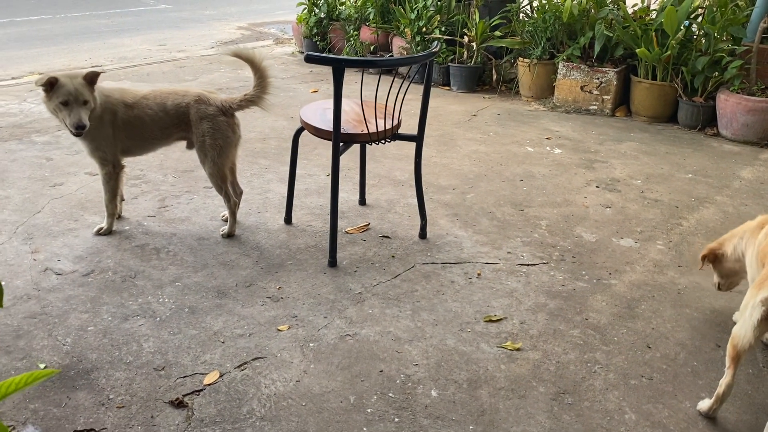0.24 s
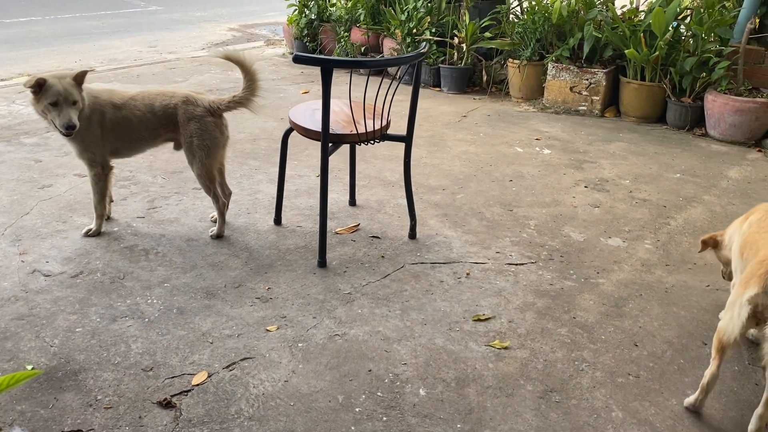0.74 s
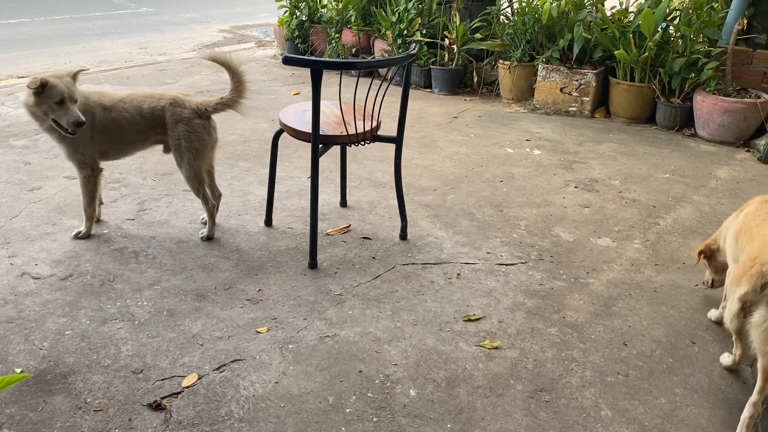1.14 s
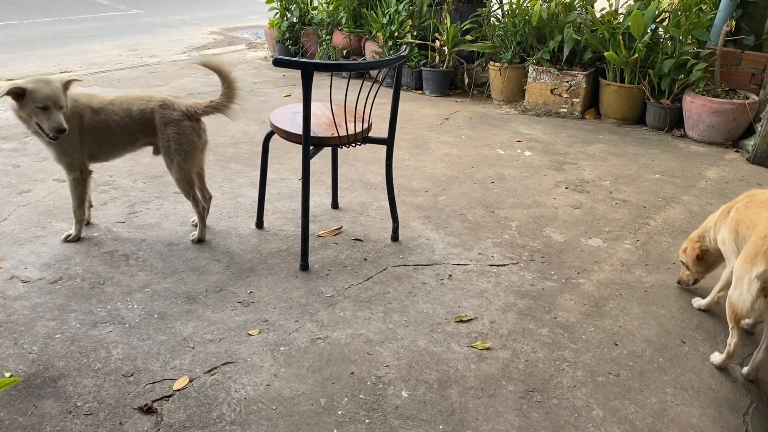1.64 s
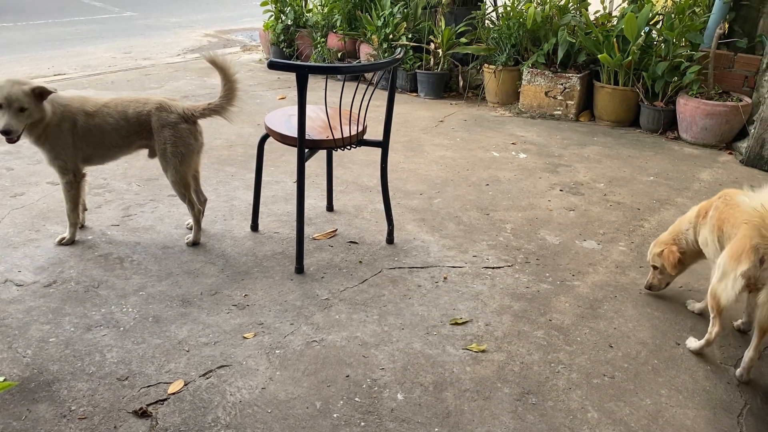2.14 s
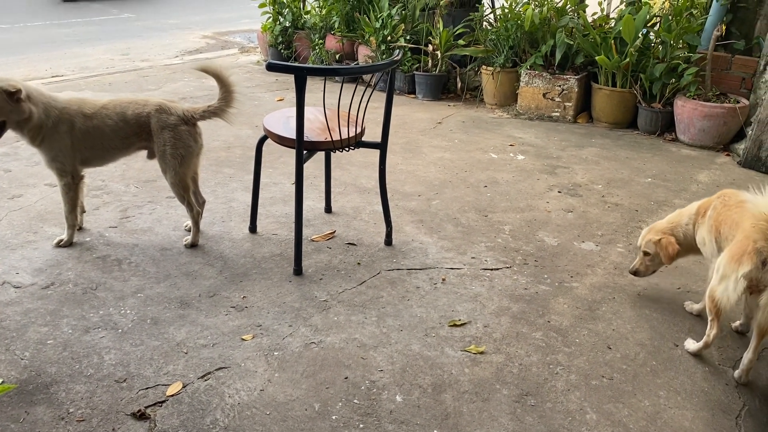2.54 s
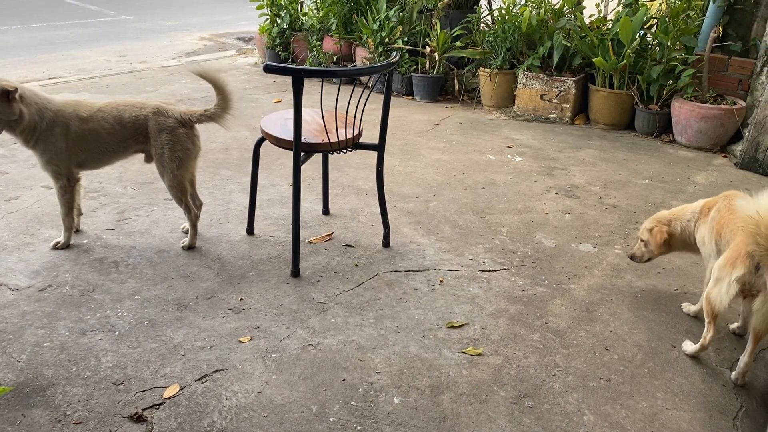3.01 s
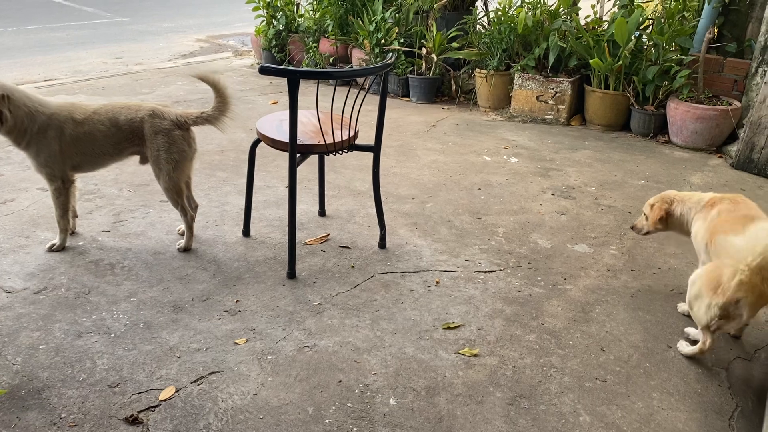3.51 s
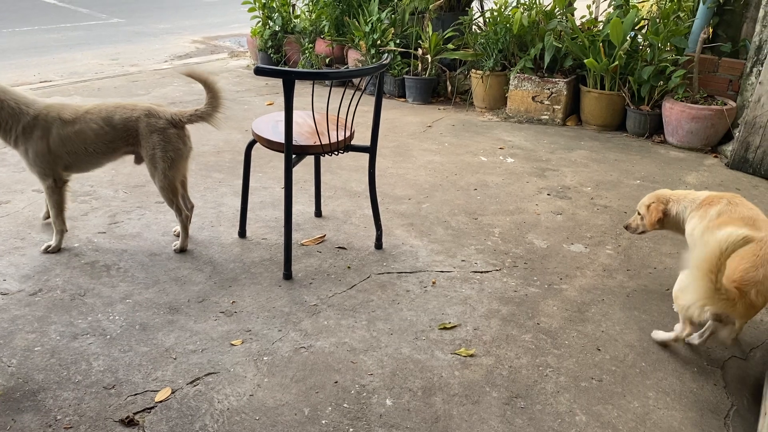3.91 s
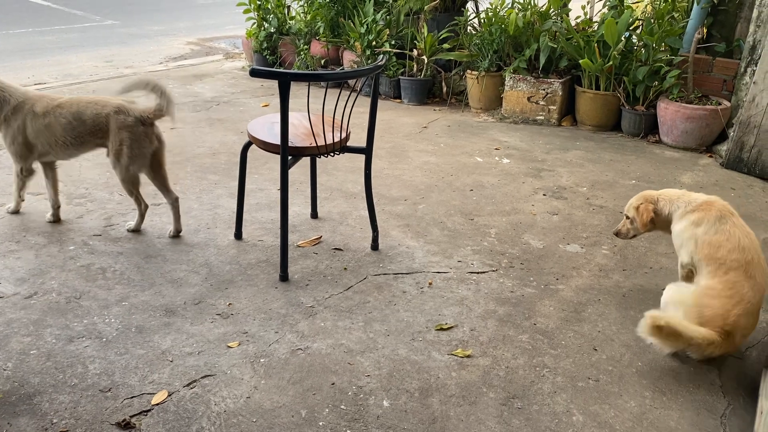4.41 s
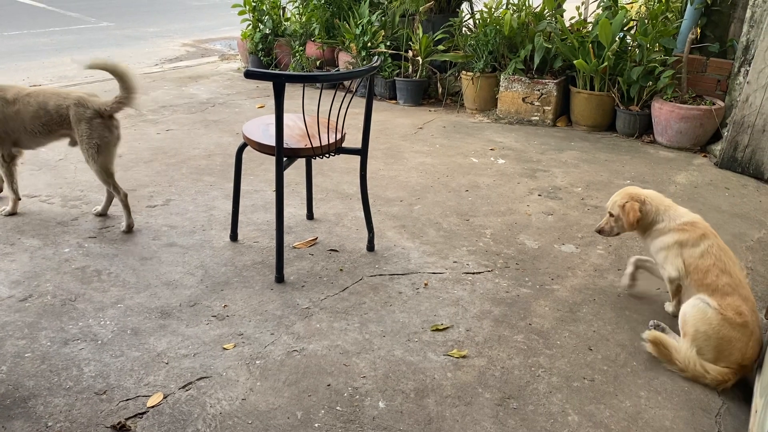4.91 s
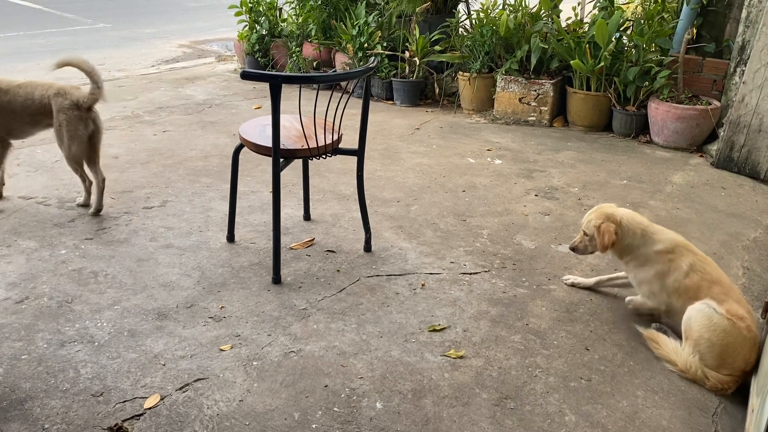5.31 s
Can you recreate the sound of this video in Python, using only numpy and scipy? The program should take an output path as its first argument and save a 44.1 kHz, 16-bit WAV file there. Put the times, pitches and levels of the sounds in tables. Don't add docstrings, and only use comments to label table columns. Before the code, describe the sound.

Small engines pass one after another on a nearby road with throbbing exhaust and tyre rumble, while faint sparrows chirp and a dog's claws tick on concrete.

```python
import sys
import numpy as np
from scipy import signal
from scipy.fft import rfft, irfft, next_fast_len
from scipy.io import wavfile
from scipy.ndimage import uniform_filter1d, map_coordinates

SR = 44100
rng = np.random.default_rng(int(sys.argv[2]) if len(sys.argv) > 2 else 0)


def transcribe(signal):
    frames = np.atleast_2d(signal).T
    limited = np.clip(frames, -1, 1)
    pcm = np.round(limited * 32767).astype(np.int16)
    wavfile.write(sys.argv[1], SR, pcm)


def decibels_to_gain(level_db):
    exponent = np.asarray(level_db, float) / 20
    return 10 ** exponent


N = 244755
T = np.arange(N) / SR


def along(points, hz):
    f, value = np.transpose(points)
    return np.interp(np.log(hz + 1), np.log(f + 1), value)


def curves(rows):
    s, *columns = np.transpose(rows)
    return [np.interp(T, s, column) for column in columns]


def sounding(rows, fade_s=0.37):
    inside_s = np.minimum(T - rows[0][0], rows[-1][0] - T)
    return np.clip(inside_s / fade_s + 1, 0, 1)


def unit(x):
    return x / np.sqrt(np.mean(x ** 2) + 1e-20)


def stereo_noise():
    return rng.standard_normal((2, N))


def wander(t, rate, knots=200):
    return map_coordinates(rng.standard_normal(knots), [t * rate])


def wobble(rate):
    coarse = T[::64]
    return np.interp(T, coarse, wander(coarse, rate, knots=400))


def filtered(x, response):
    m = next_fast_len(N + 8192)
    return irfft(rfft(x, m) * response(np.fft.rfftfreq(m, 1 / SR)), m)[..., :N]


def notch(hz, at_hz, width_hz):
    return 1 - .85 * np.exp(-((hz - at_hz) / width_hz) ** 2)


# frequency_hz, share
LEFT_LEADS = [(100, 0.56), (500, 0.58), (950, 1), (1500, .1), (3000, 0.43), (6000, .1)]


def ports(x, alike, opposite, side_db):
    mid = unit(filtered(x[0], lambda hz: decibels_to_gain(along(alike, hz)) * notch(hz, 8420, 240)))

    def difference(hz):
        share = np.clip(along(LEFT_LEADS, hz), 0, 1)
        colour = decibels_to_gain(along(opposite, hz)) * notch(hz, 10050, 250)
        return colour * [1j * share, np.sqrt(1 - share ** 2)]

    side = decibels_to_gain(side_db) * unit(filtered(x, difference).sum(axis=0))
    return np.array([mid + side, mid - side])


def patchy(db):
    z = signal.stft(stereo_noise(), nperseg=512)[2]
    field = uniform_filter1d(rng.standard_normal(z.shape[1:]), size=5, axis=0)
    field = uniform_filter1d(field, size=12, axis=1)
    return signal.istft(z * decibels_to_gain(db * unit(field)), nperseg=512)[1][:, :N]


def band(hz, width_hz):
    slow = filtered(stereo_noise(), lambda f: 1 / (1 + (f / width_hz) ** 2))
    turn = 2 * np.pi * hz * T
    return unit(slow[0] * np.cos(turn) + slow[1] * np.sin(turn))


def swells(rows, width_hz):
    out = np.zeros(N)
    for s, hz, db, half_s in rows:
        out += decibels_to_gain(db) * np.exp(-((T - s) / half_s) ** 2) * band(hz, width_hz)
    return out


# frequency_hz, level_db
IDLE_TONES = [(81, -45), (107, -46), (128, -50), (141, -43.5), (162, -49)]


def distant_idle():
    return sum(decibels_to_gain(db) * band(hz, width_hz=1.5) for hz, db in IDLE_TONES)


# peak_s, frequency_hz, level_db, half_length_s
WHINE_SWELLS = [(2.12, 3240, -51, .17), (2.82, 3220, -55, .12), (2.92, 1600, -48, .2),
                (2.55, 1790, -50, .15), (4.12, 2130, -53, .02), (4.27, 2050, -56, .1),
                (4.28, 3220, -58, .05), (4.62, 2030, -56, .06), (2.15, 3750, -53, .15)]


def far_whine():
    return swells(WHINE_SWELLS, width_hz=40)


# start_s, start_pitch_hz, end_pitch_hz, length_s, level_db
CHIRPS = [
    (1.187, 4950, 4500, .025, -45),
    (1.874, 5350, 4204, 0.067, -45),
    (2.625, 5200, 4800, .025, -48),
    (2.655, 4700, 4050, .03, -48),
    (3.715, 5250, 4130, 0.064, -46.5),
    (4.329, 5700, 6350, .028, -59),
    (4.346, 5170, 4550, .032, -50.5),
    (4.356, 4500, 3330, .045, -51),
    (4.908, 5300, 3890, 0.062, -46.5),
]


def sparrows():
    out = np.zeros((2, N + SR))
    for s, start_hz, end_hz, length_s, db in CHIRPS:
        t = np.arange(round(length_s * SR)) / SR
        hz = end_hz + (start_hz - end_hz) * np.exp(-3.5 * t / length_s)
        hz = hz + 115 * wander(t, rate=500)
        turn = 2 * np.pi * np.cumsum(hz) / SR
        voices = np.sin(turn) + .35 * np.sin(1.14 * turn)
        grain = decibels_to_gain(2.5 * wander(t, rate=250))
        fading = decibels_to_gain(4 - 8 * t / length_s)
        note = unit(voices * grain) * np.sin(np.pi * t / length_s) ** 0.25 * fading

        walls = rng.standard_normal((2, SR // 5)) * decibels_to_gain(-60 * np.arange(SR // 5) / SR / 0.28)
        walls = decibels_to_gain(4) * walls / np.linalg.norm(walls[0])
        walls[:, 0] = 1
        call = decibels_to_gain(db - 2.0) * signal.fftconvolve(note[None], walls, axes=1)
        out[:, round(s * SR):][:, :call.shape[1]] += call
    return out[:, :N]


# start_s, peak_db, t60_s
CLAWS = [
    (1.0915, -27, 0.025),
    (3.9575, -28, 0.013),
]
# frequency_hz, level_db_per_hz
TICK = [(2000, -30), (4000, -12), (5500, -16), (7000, -9), (8800, -2), (10400, 1), (11800, -12),
        (12800, -8), (14000, -11), (15200, -9), (16300, -17), (17000, -60)]
TICK_SIDE = [(2350, -49), (4000, -19), (4970, -8.5), (8600, -10), (9570, -15), (13300, -14.5), (13700, -28),
             (15600, -12), (16400, -25)]
# start_s, peak_db, t60_s
SNAGS = [
    (1.11, -37, 0.032),
    (3.957, -36, .012),
    (3.966, -39, .04),
    (3.996, -40, 0.042),
    (4.005, -45, .03),
    (4.044, -44, .03),
]
# frequency_hz, level_db_per_hz
GRIT = [(2350, -39), (4000, 2), (4920, -10), (5430, -24), (5900, -9), (7380, 1), (8810, -2), (10100, 4),
        (12100, -20), (14000, -36), (16400, -36)]
GRIT_SIDE = [(2350, -46), (4000, -16), (5530, -3), (8350, 0), (9450, -9), (9850, -21), (11300, -17),
             (12900, -17), (13700, -36), (15700, -17), (16400, -33)]


def bursts(rows):
    out = np.zeros(N)
    for s, db, t60_s in rows:
        out += decibels_to_gain(db - 8.0 - 60 * abs(T - s) / t60_s) * (T >= s - .0012)
    return out


def dog():
    hold_s, attack_s, release_s = .095, .003, .012
    level_db, sag_db = -49.5, 6
    t = T - 3.957
    stroke = np.clip(np.minimum(t / attack_s, 1 + (hold_s - t) / release_s), 0, 1)
    tiring_db = sag_db * np.clip(t / hold_s, 0, 1)
    scuff = stroke * decibels_to_gain(level_db - tiring_db + 2.8 * wander(T, rate=600, knots=4000))
    ticks = bursts(CLAWS) * ports(stereo_noise(), TICK, TICK_SIDE, side_db=1)
    return ticks + (scuff + bursts(SNAGS)) * ports(stereo_noise(), GRIT, GRIT_SIDE, side_db=2.0)


# time_s, roar_db, brightness_db
ROAD = [(0, -50.5, -9), (.28, -48.5, -8), (.52, -45, -9), (.79, -41.5, -9), (1.05, -39, -7.5),
        (1.25, -39.5, -5), (1.63, -39, -2.5), (1.82, -39.5, -4.5), (1.99, -40.5, -9), (2.15, -41.5, -6.5),
        (2.6, -43, -4.5), (2.75, -41.5, -6.5), (2.95, -42.5, -9), (3.23, -47, -9.5), (3.77, -49, -11),
        (4.5, -49, -10), (5.1, -45, -11.5), (5.5, -43.5, -8.5)]
# frequency_hz, level_db_per_hz
RUMBLE = [(20, -24), (44, -11), (52, -6), (60, -2), (80, 0), (100, -2), (140, -1), (175, -4), (220, -13),
          (290, -40), (480, -120)]
RUMBLE_SIDE = [(12, -57), (20, -27), (69, -24), (87, 1), (129, 16), (220, -16), (290, -43), (480, -120)]
DRONE = [(110, -43), (180, -5.5), (215, -7), (260, -3), (330, -2.5), (400, -5), (455, -13), (560, -23.5),
         (730, -63), (1230, -120)]
DRONE_SIDE = [(110, -27), (180, 2), (270, -12), (367, 3), (440, -15), (560, -4), (730, -19), (1230, -120)]
BODY = [(260, -39), (450, -7.5), (550, -1.5), (758, -3.5), (829, -3), (1040, -3), (1200, -12), (1560, -21),
        (2640, -120)]
BODY_SIDE = [(260, -25), (450, -4.5), (550, -3.5), (764, -5.5), (985, -3), (1200, -8), (1560, -34),
             (2640, -120)]
ROAR = [(680, -26), (1150, -3.5), (1220, -2.5), (1570, 0.5), (1900, -3), (2420, -3), (3050, -7),
        (3220, -6.5), (3800, -10.5), (4940, -17), (8360, -120)]
ROAR_SIDE = [(680, -37), (1150, -6), (1360, -2), (1770, -3), (2210, -11), (2420, -8.5), (2680, -11),
             (3240, -8.5), (3800, -15), (4940, -39), (8360, -120)]
HISS = [(1760, -9.5), (3000, -6.5), (3270, -3), (4690, -2), (6550, -2.5), (8450, -9.5), (10200, -3.5),
        (10900, -8), (11700, -24), (12000, -55), (12200, -67), (12900, -24), (14500, -20), (15300, -45),
        (16400, -79)]
HISS_SIDE = [(1760, -15), (3000, -3.5), (4430, -5), (5070, 0), (6270, -8.5), (8630, -1), (9540, -6),
             (10000, -25), (11000, -11), (12300, -9), (13200, -26), (13800, -60), (14300, -38),
             (15100, -25), (15600, -30), (16000, -70)]


def road_noise(throb, load_db):
    roar_db, open_db = curves(ROAD)
    swell_db = roar_db + 44
    rumble_db = -34 + 0.44 * swell_db + 0.057 * load_db
    drone_db = -39.5 + 0.28 * swell_db + 0.14 * load_db
    body_db = roar_db + 4 + 0.6 * open_db + 0.21 * throb
    body_gain = np.hypot(decibels_to_gain(body_db), decibels_to_gain(-57.5))
    throbbing_db = roar_db + 0.5 * throb + 0.21 * wobble(13)
    hiss_db = roar_db + open_db + 2 + 0.83 * throb + 0.78 * wobble(22.94)

    out = decibels_to_gain(rumble_db) * ports(stereo_noise(), RUMBLE, RUMBLE_SIDE, side_db=-19.5)
    out += decibels_to_gain(drone_db) * ports(stereo_noise(), DRONE, DRONE_SIDE, side_db=-8.0)
    out += body_gain * ports(patchy(0.74), BODY, BODY_SIDE, side_db=-2.0)
    out += decibels_to_gain(throbbing_db) * ports(patchy(0.99), ROAR, ROAR_SIDE, side_db=-2.0)
    out += decibels_to_gain(hiss_db) * ports(patchy(1.0), HISS, HISS_SIDE, side_db=-2.0)
    return out


# peak_s, frequency_hz, level_db, half_length_s
TREAD_SWELLS = [(1.13, 812, -42.5, 0.13), (1.5, 818, -42.5, 0.064), (2.3, 825, -44, 0.1),
                (1.88, 615, -44.5, 0.13), (2.68, 648, -46, 0.17), (1.25, 655, -50, 0.15),
                (2.51, 1005, -46.5, .12), (2.44, 840, -51, 0.11), (1.21, 570, -47, .08),
                (1.7, 665, -51, .2)]


def tread_hum():
    return swells(TREAD_SWELLS, width_hz=15.0)


# peak_s, frequency_hz, level_db, half_length_s
PANEL_BUZZES = [
    (1.08, 2445, -39.5, .065),
    (.9, 2440, -48, .1),
    (1.28, 2470, -46.5, .13),
    (1.47, 2380, -51, .1),
    (1.62, 2400, -51, .1),
]


def loose_panel(throb):
    return swells(PANEL_BUZZES, width_hz=65) * decibels_to_gain(3 * throb)


def engine(rows, orders, law, way, echoes, start, flutter_db):
    hz, near_db = curves(rows)
    crank = 2 * np.pi * np.cumsum(hz) / SR
    anchors, *rules = np.transpose(law)
    pass_s, swing_s, before, after = way
    lead = before + (after - before) * (1 + np.tanh((T - pass_s) / swing_s)) / 2
    out = np.zeros((2, N))
    for k, db in orders:
        lift_db, grows, drift = [np.interp(k, anchors, rule) for rule in rules]
        level_db = db + lift_db + grows * near_db + drift * (T - pass_s)
        for s, order, gain_db, half_s in echoes:
            if round(order) == round(k):
                level_db = level_db + gain_db * np.exp(-((T - s) / half_s) ** 2)
        pipe = start + 2.1 * k - 8 * np.log(k)
        phase = k * crank + pipe + .05 * np.sqrt(k) * wobble(5)
        half_lead = lead * k * hz / 200
        gain = np.sqrt(2) * decibels_to_gain(level_db + flutter_db * wobble(3.274))
        out += gain * np.cos([phase + half_lead, phase - half_lead])
    return out * sounding(rows), crank, decibels_to_gain(near_db) * sounding(rows)


# time_s, firing_rate_hz, nearness_db
FIRST = [
    (0, 28.06, -16.5),
    (.5, 29.05, -12.5),
    (.75, 29.59, -7),
    (1, 29.54, -0.8),
    (1.45, 29.84, -0.6),
    (1.75, 30.22, -4),
    (2.05, 30.4, -6),
    (2.6, 30.44, -10.5),
    (3.5, 30.77, -20.5),
    (4.2, 31.04, -25),
]
SECOND = [
    (.25, 33.25, -4),
    (.55, 33.52, -8),
    (1, 32.1, -22),
    (1.75, 34.21, -2),
    (2.5, 34.09, -0.1),
    (3.25, 33.89, -1.1),
    (4, 32.94, -2.5),
    (4.2, 30.41, -6),
    (4.75, 30.73, -8.5),
]
THIRD = [
    (3.25, 26.95, -18),
    (3.75, 27.08, -9.5),
    (4.05, 27.9, -13.5),
    (4.35, 28.47, -11.5),
    (4.65, 28.56, -6),
    (4.85, 29.05, -1),
    (5, 29.06, -1.5),
    (5.25, 29.3, -3.5),
    (5.55, 29.62, 1.5),
]
# multiple_of_firing_rate, level_db
FIRST_ORDERS = [(2, -31), (3, -44.5), (4, -34.5), (5, -27), (6, -27.5), (7, -39.5), (8, -30), (9, -37.5),
                (10, -38.5), (11, -48.5), (12, -45.5), (13, -57), (14, -56), (15, -60), (18, -62)]
SECOND_ORDERS = [(2, -33.5), (3, -37), (4, -34.5), (5, -70), (7, -47), (8, -44.5), (10, -55), (11, -49),
                 (16, -57.5)]
THIRD_ORDERS = [(2, -46), (3, -55), (4, -36), (5, -26), (6, -43), (7, -98), (8, -51), (9, -45.5),
                (10, -42.5), (11, -37.5), (12, -53.5), (13, -48.5), (14, -43.5), (15, -60), (16, -51.5),
                (17, -52), (18, -56.5)]
# multiple, lift_db, growth_db_per_db, drift_db_per_s (as the pipe turns)
FIRST_LAW = [(2, 4.5, 0.78, -0.9), (5, 0.26, 1.14, 0.35), (8, -2, 1.1, -4), (11, 1.1, 0.5, -0.5)]
SECOND_LAW = [(2, -2, 1.34, .1), (3, 1.5, 0.93, 0.089), (4, -7, 0.36, .1), (16, 4, 2.8, 0.11)]
THIRD_LAW = [(2, 9, 0.4, 3.3), (5, -0.6, 0.93, .1), (10, -6, 0.36, 1.4), (14, -1.3, 0.61, 5.7)]
# passing_s, swing_length_s, left_lead_before, left_lead_after (leads in rad per 100 Hz)
FIRST_WAY = (1.1, 0.078, 0.22, 0.023)
SECOND_WAY = (2.5, .3, .072, .066)
THIRD_WAY = (4.97, 0.22, 0.11, 0.3)
# peak_s, multiple, gain_db, half_length_s
FIRST_ECHOES = [(0.33, 10, 10, 0.18), (2.14, 6, 2, .3), (0.47, 6, 3.5, 0.41), (0.18, 3, 18.5, 0.66),
                (0.9, 12, 6.5, 0.25), (0.896, 8, 6.5, 0.15), (1.2, 3, 1, .3), (1.6, 3, -7, 0.17),
                (2, 4, 7, 0.48), (1.87, 7, 4, 0.42), (1.79, 10, 5, 0.22), (2.21, 10, -19, 0.3),
                (2.43, 2, -18, 0.093), (0.21, 2, -2, 0.081), (1.21, 2, 4, 0.12), (2.05, 8, -12, 0.2),
                (.3, 4, 4, 0.27), (0.22, 5, 4, 0.16), (1.2, 7, 1.5, 0.16), (2.348, 7, 8, .2),
                (0.99, 11, 6, 0.18), (1.66, 11, 6, .12), (2.46, 11, 6.5, .15), (1.37, 13, 8, 0.18),
                (1.86, 13, 10, .12), (1.75, 18, 18, 0.16), (2.76, 8, 5, 0.14), (3.08, 8, 10.5, .12),
                (3.85, 8, 17, 0.27), (4.1, 10, 8, .25), (1.52, 9, -7, 0.098), (1.32, 10, 4, 0.13),
                (0.71, 9, 4.5, .15), (3.545, 12, 8.5, .12), (4.4, 9, 12, .35)]
SECOND_ECHOES = [(1.68, 2, 8, 0.19), (3.1, 2, -2, 0.089), (4.1, 2, 2, 0.099), (4.32, 2, 10.5, 0.092),
                 (2, 3, -4, 0.16), (2.25, 3, 1, 0.17), (4.1, 3, 5, 0.13), (3.3, 3, 1.5, 0.47),
                 (4.7, 3, 8, .15), (3.74, 16, -8, .12), (0.47, 4, 10, 0.18), (2.3, 4, -10, 0.17),
                 (2.64, 4, 5, .25), (3.8, 4, 4, 0.13), (4.46, 4, -6, 0.19), (2.545, 7, 8, 0.16),
                 (2.6, 10, 14, 0.16), (2.61, 11, 7, 0.098), (3.5, 11, 2, 0.1), (2.03, 16, 5, 0.28),
                 (2.97, 16, 3, 0.17), (3.45, 16, 4, .15), (2.95, 8, -8, 0.46), (1.86, 2, 3, 0.39)]
THIRD_ECHOES = [(4.2, 15, 28, .2), (4.58, 15, 12, .1), (5.12, 15, 10, .14), (4.62, 6, 7, .15),
                (5.1, 11, 4, .08), (5.4, 14, -6, .1), (4.65, 13, 9, .12), (5.42, 13, 5, .2),
                (4.5, 12, 9, .3), (5.05, 12, 6, .1), (5.21, 11, -11, .06), (5.4, 11, 5, .15),
                (5.2, 17, 5, .15), (5.35, 9, 6, .2), (4.8, 9, 4, .12), (4.95, 8, 4, .15), (5.15, 4, 5, .35),
                (5.2, 6, 6, 0.34), (5.4, 12, 4, .3), (4.67, 14, 8, 0.17), (5.3, 13, 6, .3),
                (4.83, 11, 8.5, 0.2), (4.7, 11, -5, 0.16), (4.85, 8, 10, 0.23), (5.45, 12, 15, .2),
                (5.4, 10, 11, 0.22), (4.5, 4, -7, 0.25), (3.754, 2, 9, .15)]


def traffic():
    first, crank, first_near = engine(FIRST, FIRST_ORDERS, FIRST_LAW, FIRST_WAY, FIRST_ECHOES,
                                      start=2.4, flutter_db=1)
    second, *_ = engine(SECOND, SECOND_ORDERS, SECOND_LAW, SECOND_WAY, SECOND_ECHOES, start=.7, flutter_db=1)
    third, _, third_near = engine(THIRD, THIRD_ORDERS, THIRD_LAW, THIRD_WAY, THIRD_ECHOES,
                                  start=4.1, flutter_db=1.2)
    load_db = 10 * np.log10(first_near ** 2 + third_near ** 2)
    throb = np.cos(crank - 1.2)
    tyres = road_noise(throb, load_db) + tread_hum()
    return tyres + loose_panel(throb) + first + second + third


def scene():
    return distant_idle() + far_whine() + sparrows() + dog() + traffic()


def band_limit(x):
    return signal.sosfilt(signal.butter(12, 16500, fs=SR, output="sos"), x)


# frequency_hz, level_db_per_hz
CAPSULE = [(12700, -60), (13200, -6), (14200, 0), (15000, -3), (15300, -60)]
# frequency_hz, left_over_right_db
LEAN = [(60, 0), (110, 2), (200, -1), (380, -2), (700, 3), (1290, -0.5), (2380, 0.5), (4400, 1.5),
        (8120, 1), (15000, -1.5)]


def record(dry):
    self_noise = unit(filtered(rng.standard_normal(N), lambda hz: decibels_to_gain(along(CAPSULE, hz))))
    heard = dry + decibels_to_gain(-82) * self_noise
    mix = filtered(heard, lambda hz: decibels_to_gain(np.outer([.5, -.5], along(LEAN, hz))))
    return band_limit(mix)


dry = scene()
out = record(dry)
transcribe(out)
```